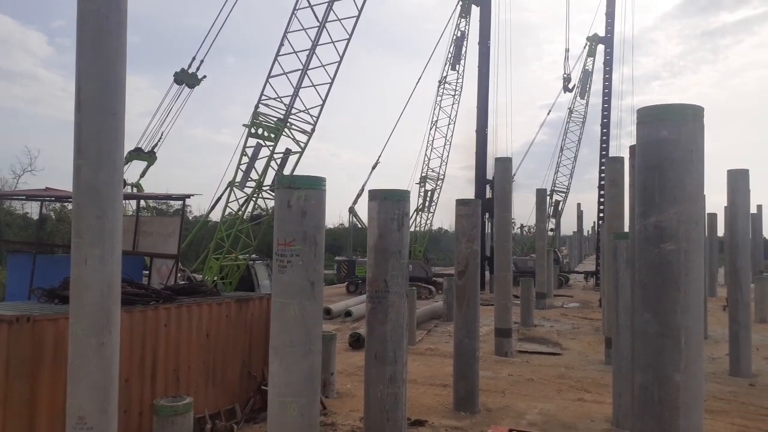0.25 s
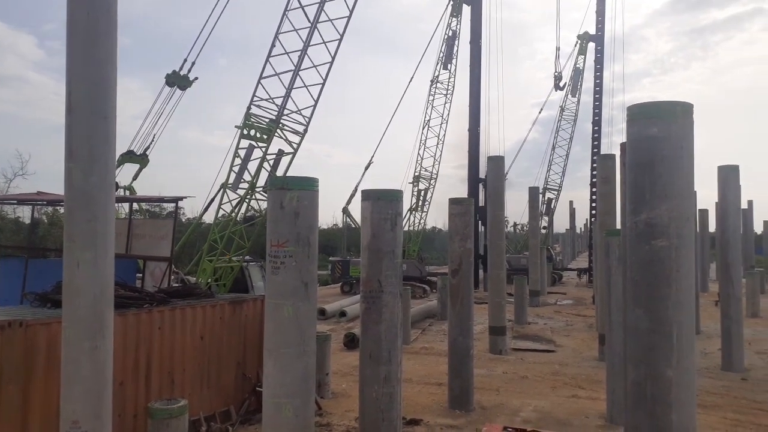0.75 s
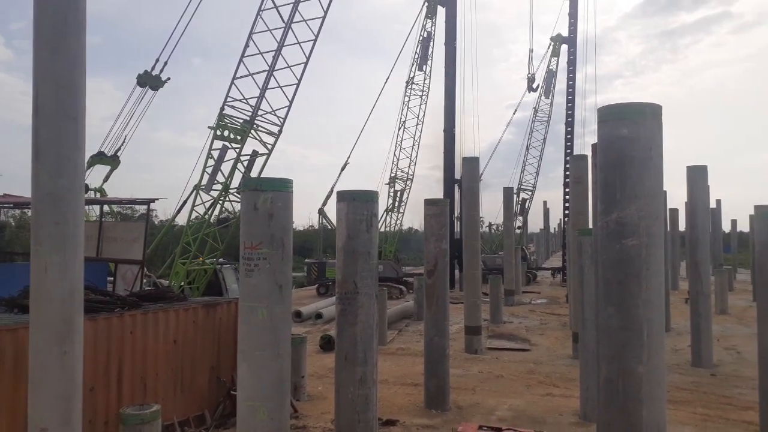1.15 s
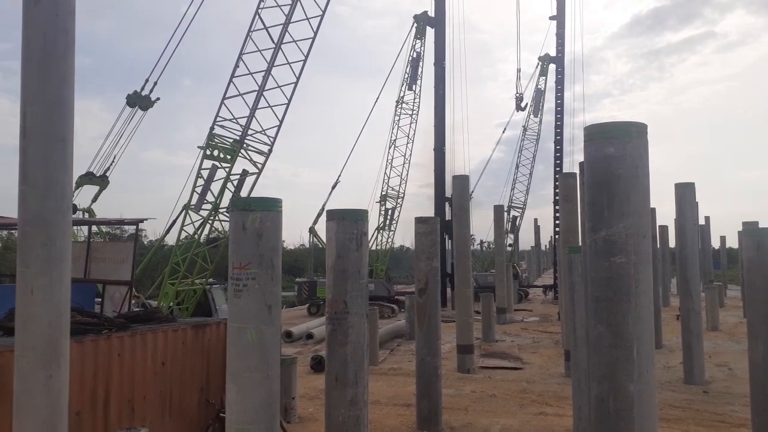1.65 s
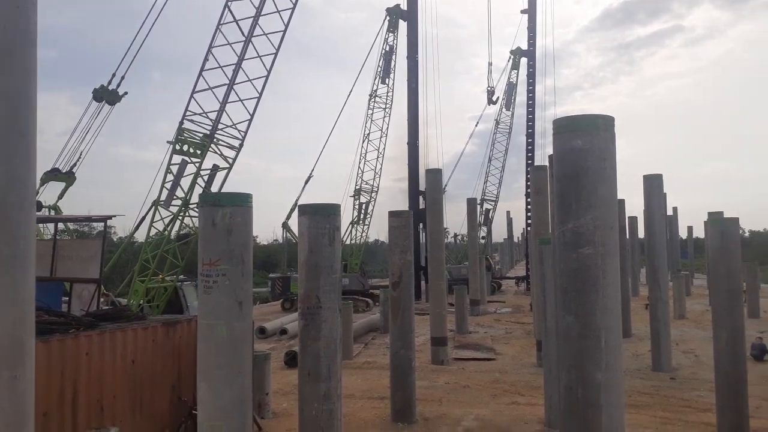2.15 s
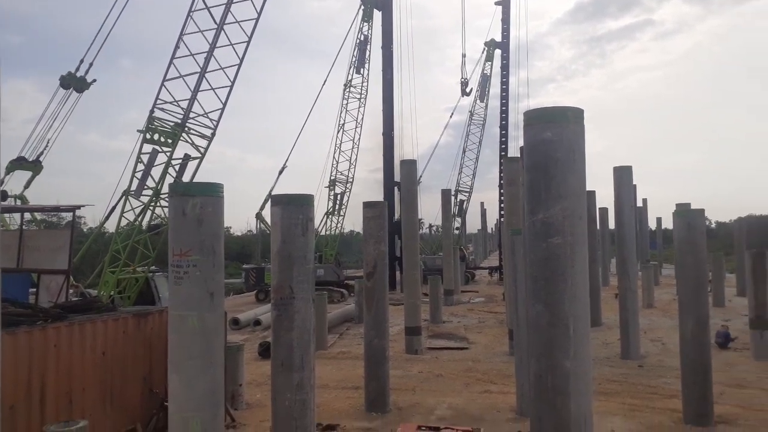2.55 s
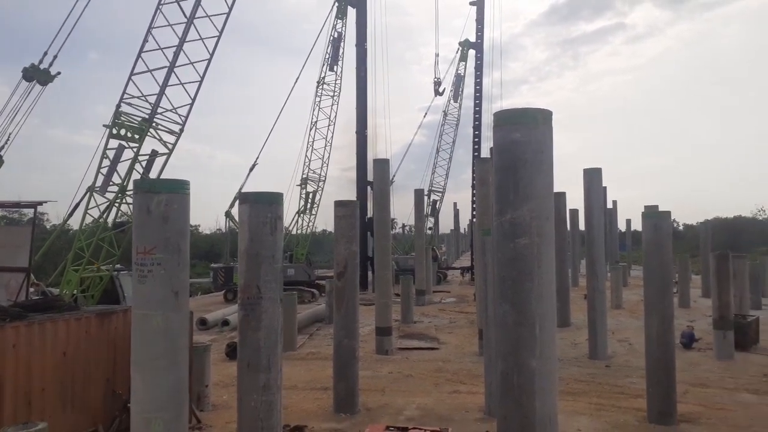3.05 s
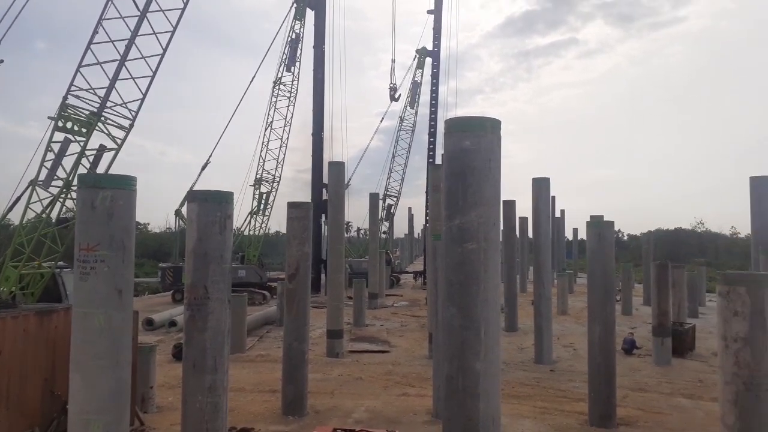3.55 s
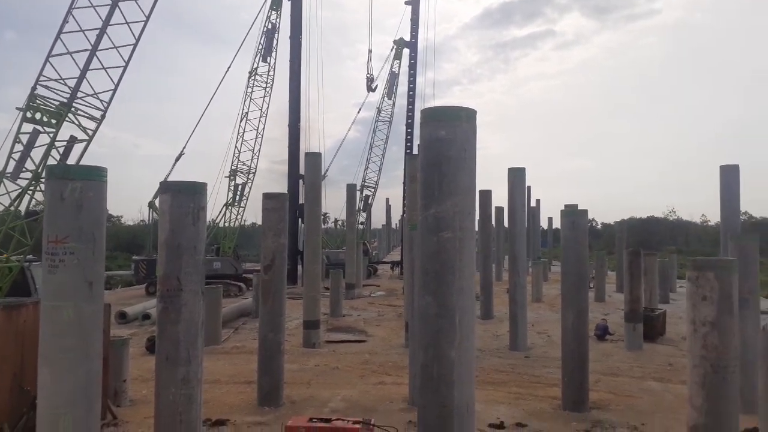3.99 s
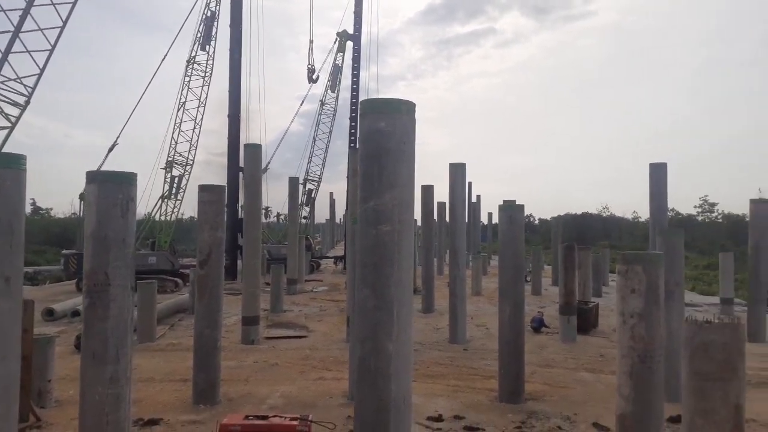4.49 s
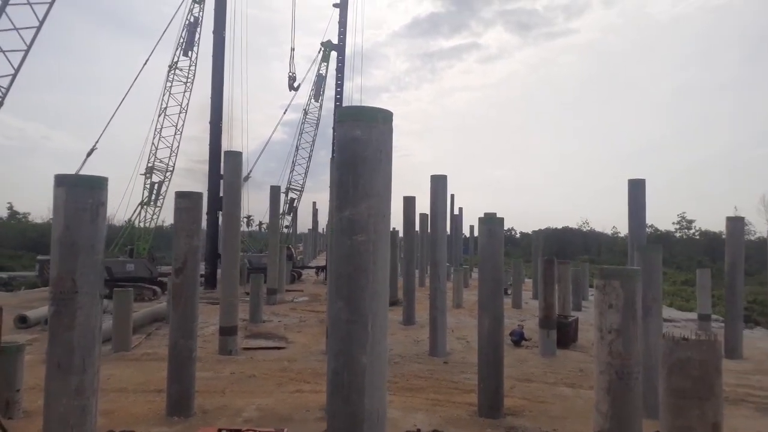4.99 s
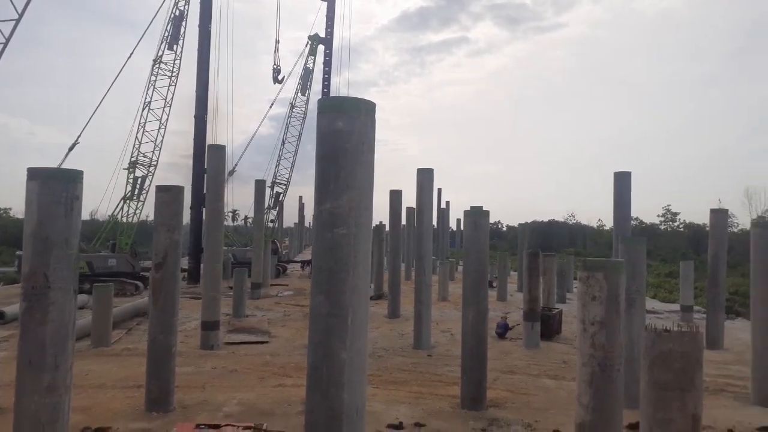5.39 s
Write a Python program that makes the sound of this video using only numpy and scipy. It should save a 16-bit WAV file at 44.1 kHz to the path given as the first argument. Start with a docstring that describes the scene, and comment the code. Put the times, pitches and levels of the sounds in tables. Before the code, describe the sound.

A hydraulic pile driver pounds a concrete pile with three heavy, clanking blows that echo across an open construction site.

```python
"""Pile driving on an open site

A hydraulic hammer drives a concrete pile, one blow every 1.6 s. Each stroke is a valve clank, a spurt
of hiss, the rattling fall of the ram, the crack of the blow and a thump of the ground. Standing piles
nearby and a far tree line scatter the sound; behind it a diesel engine drones and a bird peeps.
Heard on a closely spaced pair of microphones that turns slowly to the right."""
import sys
import numpy as np
from scipy import signal
from scipy.fft import rfft, irfft
from scipy.io import wavfile
from scipy.ndimage import uniform_filter1d

SR = 44100
rng = np.random.default_rng(int(sys.argv[2]) if len(sys.argv) > 2 else 0)


def dump_mix(stems):
    """Bounce the given channels to the path in sys.argv[1] as a 16-bit WAV at rate SR."""
    frames = np.atleast_2d(stems).T  # one column per channel
    limited = np.clip(frames, -1, 1)  # hard clip at full scale
    pcm = np.round(limited * 32767).astype(np.int16)
    wavfile.write(sys.argv[1], SR, pcm)


N = 248283
LEAD_IN = SR // 2  # the stroke before the start still rings
LENGTH = N + LEAD_IN
TIME = (np.arange(LENGTH) - LEAD_IN) / SR
STROKE_SAMPLES = 2 ** 17
STROKE_HZ = np.fft.rfftfreq(STROKE_SAMPLES, 1 / SR)

# Wash of distant plant. Each row: frequency in Hz, relative level in dB.
SITE_COLOUR = [(15, -40), (25, -15.5), (110, 2.5), (144, -16), (216, -10), (342, -28.5), (437, -18),
               (749, -8.5), (905, -17.5), (1220, -14.5), (1930, -22.5), (2090, -21.5), (6310, -31.5),
               (9460, -53), (15800, -49)]
# Tones of the diesel. Each row: frequency in Hz, level in dB.
ENGINE_TONES = [(49.5, -58), (102.3, -58), (339, -64), (651, -62)]
# The bird. Each row: start in seconds, pitch in Hz, level in dB.
BIRD_PEEPS = [(2.675, 6100, -63), (2.72, 5780, -76), (5.412, 6170, -53), (5.493, 6150, -49),
              (5.588, 6200, -47.5)]
# Scatter off the near piles and the far trees. Each row: frequency in Hz, time to fall 60 dB in seconds.
PILES_DECAY = [(100, 1), (600, 0.72), (2000, 0.65), (6000, 0.55), (10000, 0.5), (15500, 0.45)]
TREES_DECAY = [(100, 5.55), (600, 1.86), (2000, 1.584), (6000, 1.284), (10000, 0.99), (15500, 0.6)]
# Likeness of the two microphones. Each row: frequency in Hz, unshared against shared sound in dB.
MIC_UNSHARED = [(60, -22.5), (300, -19.5), (650, -16), (1000, -7), (1500, -3.5), (2300, -2.5), (4000, -2),
                (15000, -1)]
# Shading of the pair. Each row: frequency in Hz, left minus right in dB.
MIC_BALANCE = [(700, 0), (1900, 2.5), (3600, -3.5), (5000, 0), (5900, -6), (7300, -3), (8600, -4.5),
               (9900, 6), (11000, 4), (13500, 8), (16000, 2.5)]
# The pair turns right. Each row: time in seconds, lead of the left microphone in ms.
MIC_TURN = [(0, -.075), (3, -0.021), (4.7, .12)]
# Resonances of the hammer's steel casing. Each row: frequency in Hz, width in Hz, lift in dB.
CASING_RESONANCES = [(473, 23, -4.5), (613, 60, -1.5), (716, 53, 4), (806, 34, 3.5), (950, 110, -0.5),
                     (1038, 100, 2), (1570, 79, 2.5), (2230, 100, 3.5), (2320, 170, -4), (3450, 38.7, 2.5),
                     (5360, 43, -1.5), (5880, 130, 2)]
# Modes of the hammer's housing and of the pile in the ground.
# Each row: frequency in Hz, relative level in dB, time to fall 60 dB in seconds.
HOUSING_MODES = [(560.7, -6, 0.079), (619.7, -7, 0.15), (675.3, -4.5, 0.079), (772, -14.5, 0.065),
                 (1116, -10.5, 0.07), (1222, -13.5, 0.062), (1567, -12.5, 0.027), (710.3, -37.5, 2.4),
                 (1210, -45, 2), (2110, -53, 2.2), (2492, -44, 1.9), (3430, -43, 2.2)]
GROUND_MODES = [(68.5, -5, 0.36), (85, 4, 0.23), (92.8, -10, 0.69), (115, -25.5, 1)]
# Notes of a loose shackle. Each row: frequency in Hz, relative level in dB.
SHACKLE_MODES = [(3430, 2.5), (5620, 2.5)]
# Its chinks. Each row: start in seconds, level in dB.
SHACKLE_CHINKS = [(2.853, -44), (2.91, -35)]
# Colour of each part of the stroke. Each row: frequency in Hz, relative level in dB.
CLANK_COLOUR = [(35, -20), (60, -9.5), (103, -12.5), (337, -8.5), (632, -9.5), (877, -17.5), (1240, -14.5),
                (1890, -22.5), (2030, -17.5), (2500, -26.5), (3470, -22), (4590, -29), (6510, -27),
                (9460, -43.5), (15800, -44.5)]
HISS_COLOUR = [(300, -21.5), (1200, 4.5), (3000, 4), (7000, -2), (9500, -17), (12000, -12.5),
               (16000, -19.5)]
FALL_COLOUR = [(35, -56), (60, -14.5), (146, -12.5), (267, -2.5), (501, -4), (618, -0.5), (877, -9),
               (1130, -7.5), (1270, -12), (1530, -8), (1810, -15), (5930, -20.5), (8030, -29),
               (9460, -41.5), (15800, -35.5)]
SCRAPE_COLOUR = [(1000, -30.5), (3000, -21.5), (6000, -5), (8000, 6.5), (9600, -16.5), (12000, -1),
                 (16000, -12)]
CRACK_COLOUR = [(150, -31), (400, -14.5), (650, -1.5), (1150, 3.5), (1700, -0.5), (2300, 2), (2900, -4.5),
                (5700, -1.5), (8200, -7.5), (9700, -23), (12000, -12.5), (15800, -18)]
REBOUND_COLOUR = [(150, 0.5), (700, -10.5), (2000, -3), (6500, -5), (8200, -18), (9600, -22.5),
                  (12000, -22), (16000, -29.5)]
# The valve opens, then seats. Each row: start in seconds, opening knock in dB,
# time to seat in seconds, seating knock in dB, pitch ratio.
VALVE_OPENINGS = [(-.402, -11, .02, -3, 1.34), (1.216, -19, 0.016, -17, 0.98),
                  (2.832, -17.5, 0.022, -23, 1.02), (4.441, -18, 0.011, -12, 1.013)]
# The ram lands. Each row: time in seconds, force in dB, late clack in dB, boom in dB, brightness in dB.
RAM_BLOWS = [(-.166, -8.5, -32, -2, -0.5), (1.449, -10.5, -31, -3, -0.5), (3.068, -11, -28, -1.5, 0.9),
             (4.683, -13, -32.5, -3, 0.5)]


def gain_of(db):
    """Decibels as an amplitude factor."""
    return 10 ** (np.asarray(db) / 20)


def unit_rms(x):
    """Scales to rms 1."""
    return x / np.sqrt(np.mean(x ** 2) + 1e-20)


def curve_at(points, hz):
    """Joins points by straight lines on a log-frequency axis."""
    f, value = np.transpose(points)
    return np.interp(np.log(hz + 1), np.log(f + 1), value)


def add(mix, start_s, sound):
    """Mixes a sound into both channels from start_s on."""
    part = mix[:, max(round(start_s * SR), 0):][:, :sound.shape[-1]]
    part += sound[..., :part.shape[1]]


def waver(top_hz):
    """Slow random wander of rms 1, up to the given rate."""
    rates = np.geomspace(top_hz / 10, top_hz, 10)
    return unit_rms(sum(np.sin(2 * np.pi * (hz * TIME + rng.random())) for hz in rates))


def microphone_pair(spectra, hz, lead_ms=0):
    """Two microphones side by side: alike in the bass, unrelated and differently shaded in the treble."""
    angle = np.arctan(gain_of(curve_at(MIC_UNSHARED, hz)))
    shared, unshared = np.cos(angle) * spectra[0], np.sin(angle) * spectra[1]
    tilt = gain_of(curve_at(MIC_BALANCE, hz) / 2) * np.exp(1j * np.pi * hz * lead_ms / 1000)
    return np.array([(shared + unshared) * tilt, (shared - unshared) / tilt])


def distant_plant(db=-50, swell_db=0.7):
    """Machines far across the site blur into a low, gently swelling wash."""
    hz = np.fft.rfftfreq(LENGTH, 1 / SR)
    spectra = rfft(rng.standard_normal((2, LENGTH))) * gain_of(curve_at(SITE_COLOUR, hz))
    wash = irfft(microphone_pair(spectra, hz), LENGTH)
    return gain_of(db + swell_db * waver(5.3)) * unit_rms(wash)


def diesel(drift=0.011, throb_db=6.0):
    """An engine drones in the centre, each tone wavering in level and pitch."""
    drone = np.zeros(LENGTH)
    for hz, db in ENGINE_TONES:
        throb = gain_of(db + throb_db * waver(5.4))
        pitch = hz * (1 + drift * waver(11))
        drone += throb * np.sin(2 * np.pi * np.cumsum(pitch) / SR)
    return drone


def bird(rise=.004, t60=0.14, sag_hz=120, blur_hz=35):
    """Short thin peeps that sag slightly in pitch and fade among the trees."""
    out, t = np.zeros((2, LENGTH)), np.arange(SR // 6) / SR
    for start, hz, db in BIRD_PEEPS:
        blur = unit_rms(uniform_filter1d(rng.standard_normal((2, len(t))), size=100))
        pitch = hz + sag_hz * np.exp(-t / .006) + blur_hz * blur
        envelope = np.minimum(t / rise, 1) * gain_of(db - 60 * t / t60)
        add(out, start + LEAD_IN / SR, envelope * np.sin(2 * np.pi * np.cumsum(pitch, axis=1) / SR))
    return out


def scatter(decay, onset_s):
    """Spectrum of a tail of many reflections that builds up, each band dying at its own speed."""
    hz, t, bands = signal.stft(rng.standard_normal((2, 2 * SR)), SR, nperseg=256)
    bands = bands * gain_of(-60 * t / curve_at(decay, hz)[:, None]) * (1 - np.exp(-t / onset_s))
    tail = signal.istft(bands, SR, nperseg=256)[1]
    return rfft(tail / np.linalg.norm(tail[0]), STROKE_SAMPLES)


def across_site(direct, tails, cycle_s=.017):
    """Spectrum with the site's reflections; tails take turns so the echo fades smoothly, not ringing."""
    angle = np.pi * np.arange(STROKE_SAMPLES) / SR / cycle_s
    count = len(tails)
    shares = (np.sqrt(2 / count) * np.cos(angle + np.pi * k / count) for k in range(count))
    return rfft(direct) + sum(rfft(direct * abs(share)) * tail for share, tail in zip(shares, tails))


def ground_thump(db=-8, rise=0.0093, side_db=-25):
    """The pile shoves the soil, which swings a few times; the two microphones differ slightly."""
    t = np.arange(SR) / SR
    modes = sum(gain_of(level - 60 * t / t60) * np.exp(2j * np.pi * hz * t)
                for hz, level, t60 in GROUND_MODES)
    swings = modes * (1 - np.exp(-t / rise))
    side = gain_of(side_db) * np.array([swings.real, -swings.real])
    return gain_of(db) * (side - swings.imag)


def shackle(db, rise=.002, t60=0.09):
    """A small loose piece of steel rings on two high notes."""
    t = np.arange(SR // 4) / SR
    notes = sum(gain_of(level) * np.sin(2 * np.pi * (hz * t + rng.random((2, 1))))
                for hz, level in SHACKLE_MODES)
    return np.minimum(t / rise, 1) * gain_of(db - 60 * t / t60) * notes


def casing(colour, ring):
    """Impulse response of energy 1: a broad colour plus the steel casing's resonances, scaled by ring."""
    hz = np.fft.rfftfreq(4096, 1 / SR)
    lift_db = sum(lift / (1 + (2 * (hz - f) / width) ** 2) for f, width, lift in CASING_RESONANCES)
    log_gain = np.log(gain_of(np.maximum(curve_at(colour, hz) + ring * lift_db, -100)))
    mirrored = np.r_[log_gain, log_gain[-2:0:-1]]
    minimum_phase = np.exp(np.conj(signal.hilbert(mirrored)))
    response = np.fft.ifft(minimum_phase).real
    return response / np.linalg.norm(response)


def burst(colour, db, rise, until, t60, ring=1, rattle_db=0):
    """Dense small contacts swell, hold and die away, exciting the casing; times are in seconds."""
    t = np.arange(SR // 2) / SR
    envelope = np.minimum(t / rise, 1) * gain_of(db - 60 * np.maximum(t - until, 0) / t60)
    rattle = unit_rms(uniform_filter1d(rng.standard_normal(len(t)), size=300))
    force = envelope * gain_of(rattle_db * rattle) * rng.standard_normal((2, len(t)))
    return signal.fftconvolve(force, casing(colour, ring)[None], axes=1)


def housing_knock(db, pitch=1, rise=0.0046, detune=.03):
    """The housing rings hollow, a little differently for each point of contact."""
    t = np.arange(3 * SR // 2) / SR
    out = np.zeros((2, len(t)))
    for hz, level, t60 in HOUSING_MODES:
        phases, shift = rng.random((2, 1)), rng.random() - .5
        age = t[:int(t60 * SR)]
        ratio = pitch + detune * shift if t60 < 1 else 1  # the thin long modes keep their pitch
        add(out, 0, gain_of(level - 60 * age / t60) * np.sin(2 * np.pi * (hz * ratio * age + phases)))
    return gain_of(db) * np.minimum(t / rise, 1) * out


def valve(open_db, seat_s, seat_db, pitch):
    """The valve lets go with a clank, knocking as it opens and again as it seats."""
    out = np.zeros((2, STROKE_SAMPLES))
    add(out, 0, burst(CLANK_COLOUR, -28.5, rise=.016, until=.035, t60=.26, ring=1.3, rattle_db=-2.5))
    add(out, 0, housing_knock(open_db, pitch))
    add(out, seat_s, housing_knock(seat_db, pitch))
    return out


def ram_fall(hit_s, release_s=.102, sway_s=.039, jitter_s=.008):
    """A spurt of hiss; the ram rattles down, scraping as it sets off and just before it lands."""
    out = np.zeros((2, STROKE_SAMPLES))
    add(out, hit_s - .162, burst(HISS_COLOUR, -30.5, rise=.006, until=.012, t60=.3, ring=.8))
    add(out, release_s, burst(FALL_COLOUR, -17.5, rise=.019, until=.092, t60=.49, ring=.99, rattle_db=2))
    add(out, release_s + .008, burst(SCRAPE_COLOUR, -31.5, rise=.0087, until=.01, t60=.13, rattle_db=3))
    add(out, hit_s - .044, burst(SCRAPE_COLOUR, -36, rise=.022, until=.037, t60=.09, rattle_db=-5))
    # the ram sways from side to side and knocks three times against its housing
    for k, (late, hard) in enumerate(rng.uniform(-1, 1, (3, 2))):
        add(out, release_s + .022 + k * sway_s + late * jitter_s, housing_knock(db=-12 + 2 * hard))
    return out


def ram_blow(hit_s, force_db, clack_db):
    """The steel cap cracks on the concrete, jolts the housing and rebounds; a lighter clack follows."""
    out = np.zeros((2, STROKE_SAMPLES))
    crack = burst(CRACK_COLOUR, force_db, rise=.008, until=.011, t60=.11, ring=.78, rattle_db=1.5)
    jolt = housing_knock(force_db + 1)
    rebound = burst(REBOUND_COLOUR, force_db - 8, rise=.016, until=.025, t60=.1, ring=.34, rattle_db=1.5)
    clack = burst(REBOUND_COLOUR, clack_db, rise=.009, until=.0096, t60=.063, ring=.64)
    for delay_s, sound in (0, crack), (0, jolt), (.046, rebound), (.2, clack):
        add(out, hit_s + delay_s, sound)
    return out


def voicing(boom_db, bright_db, boom_hz=260, bright_hz=4500):
    """Each stroke arrives a little differently: a bell of low boom, and a shelf of treble that shifts as the
    pair turns."""
    boom = np.exp(-2 * np.log2((STROKE_HZ + 1) / boom_hz) ** 2)
    treble = STROKE_HZ ** 4 / (STROKE_HZ ** 4 + bright_hz ** 4)
    return gain_of(boom_db * boom + bright_db * treble)


def hammer_stroke(opening, blow, tails, thump_delay_s=.0232):
    """One cycle of the hammer as it reaches the microphones; returns its start in the mix and sound."""
    opens_s, *clank = opening
    lands_s, force_db, clack_db, boom_db, bright_db = blow
    hit_s = lands_s - opens_s
    direct = valve(*clank) + ram_fall(hit_s) + ram_blow(hit_s, force_db, clack_db)
    for chink_s, db in SHACKLE_CHINKS:
        if opens_s < chink_s < lands_s:
            add(direct, chink_s - opens_s, shackle(db))
    spectra = across_site(direct, tails) * voicing(boom_db, bright_db)
    lead_ms = np.interp(lands_s, *np.transpose(MIC_TURN))
    sound = irfft(microphone_pair(spectra, STROKE_HZ, lead_ms))
    add(sound, hit_s + thump_delay_s, ground_thump())
    return opens_s + LEAD_IN / SR, sound


def scene(low_cut_hz=36):
    """Hammer strokes over the steady site, heard by microphones that lose the deepest bass."""
    tails = [gain_of(-5.5) * scatter(PILES_DECAY, onset_s=.0071)
             + gain_of(-13.5) * scatter(TREES_DECAY, onset_s=.067) for _ in range(3)]
    mix = distant_plant() + diesel() + bird()
    for opening, blow in zip(VALVE_OPENINGS, RAM_BLOWS):
        add(mix, *hammer_stroke(opening, blow, tails))
    low_cut = signal.butter(N=4, Wn=low_cut_hz, btype="high", fs=SR, output="sos")
    return signal.sosfilt(low_cut, mix)[:, LEAD_IN:]


def record(dry):
    """The recorder clips the loudest peaks, then cuts the treble above 15.9 kHz."""
    high_cut = signal.firwin(511, 15900, window=("kaiser", 9), fs=SR)
    return signal.oaconvolve(np.clip(dry, -.92, .92), high_cut[None], "same", axes=1)


dry = scene()
out = record(dry)
dump_mix(out)
```